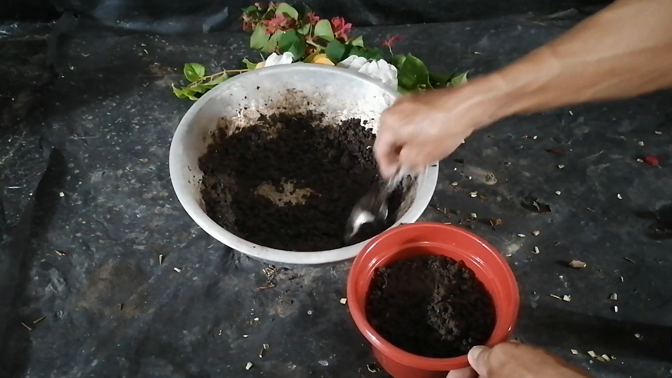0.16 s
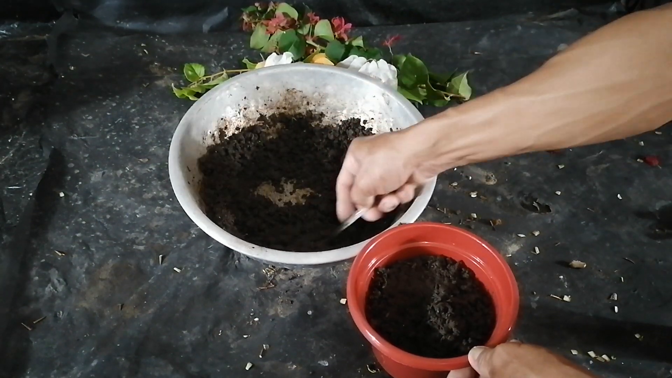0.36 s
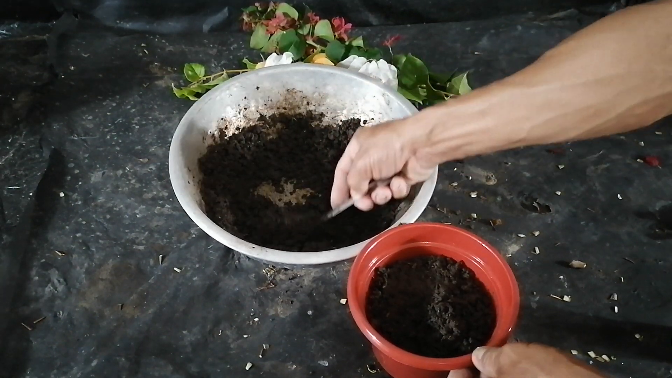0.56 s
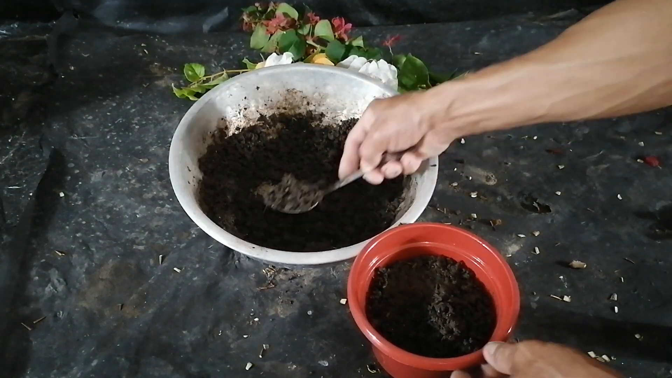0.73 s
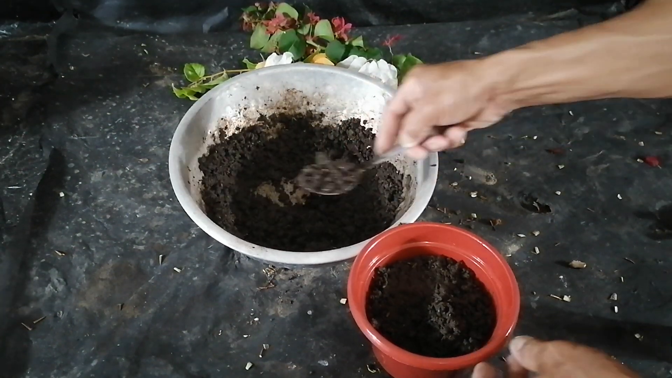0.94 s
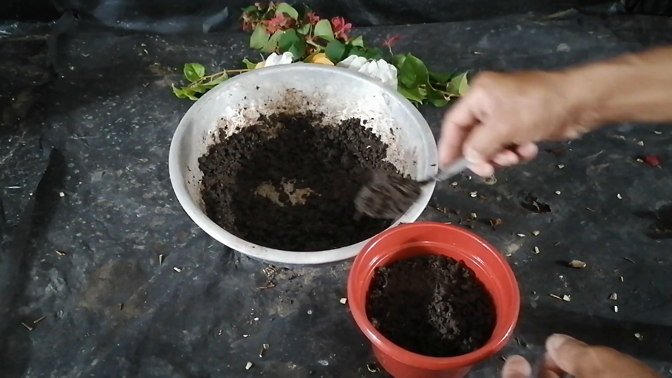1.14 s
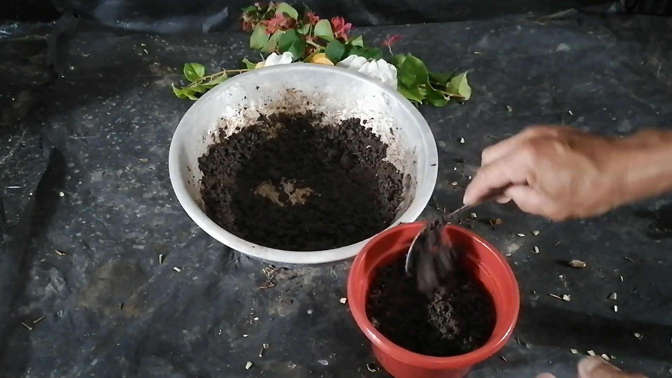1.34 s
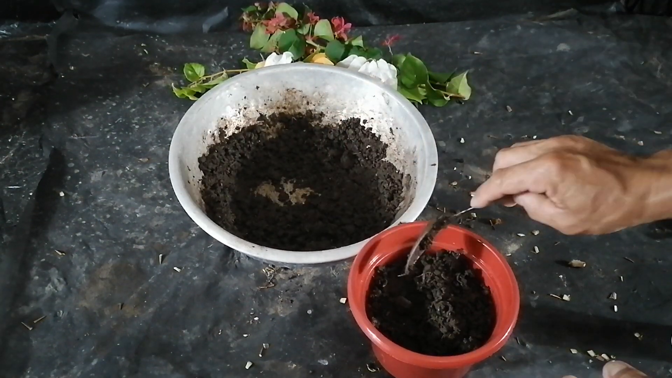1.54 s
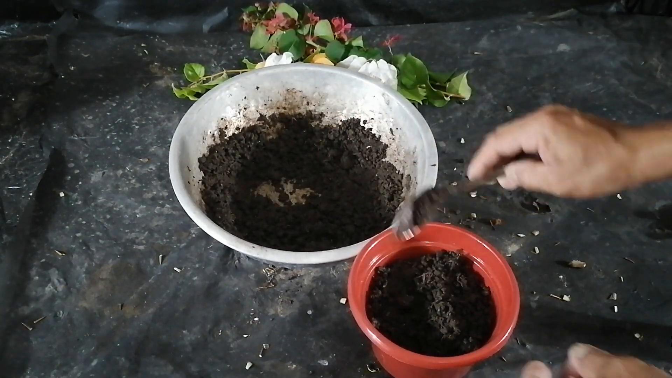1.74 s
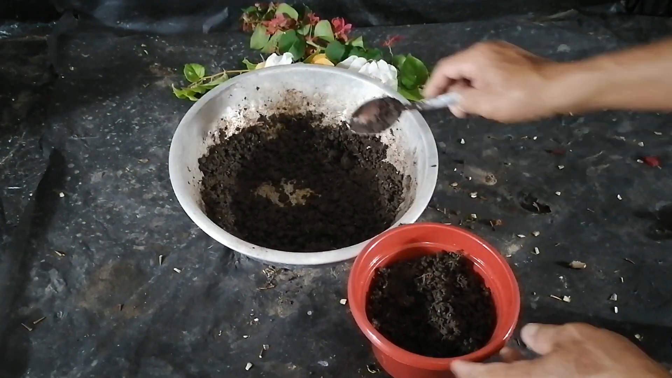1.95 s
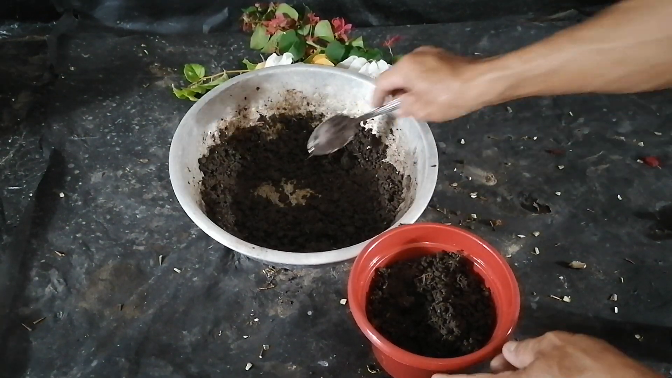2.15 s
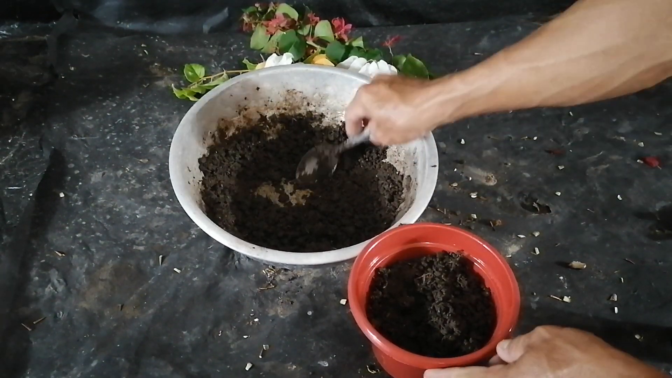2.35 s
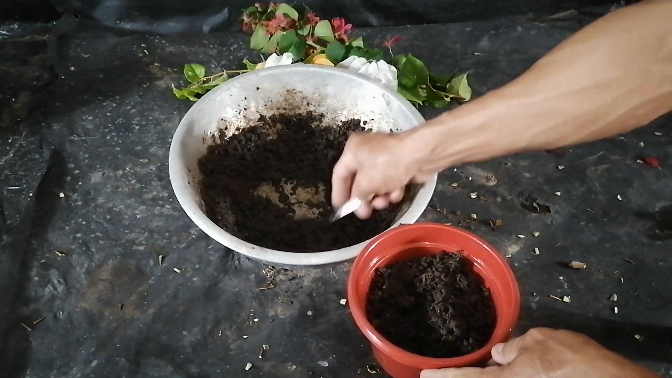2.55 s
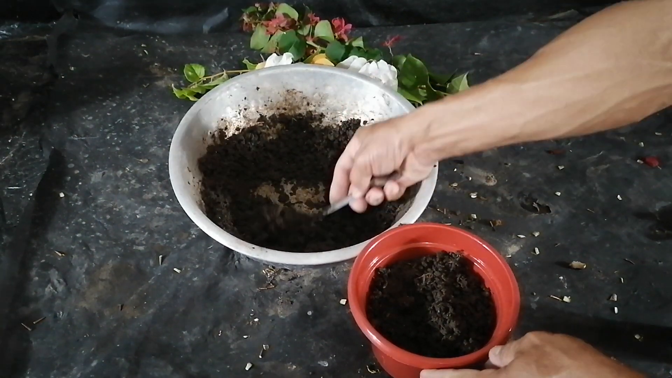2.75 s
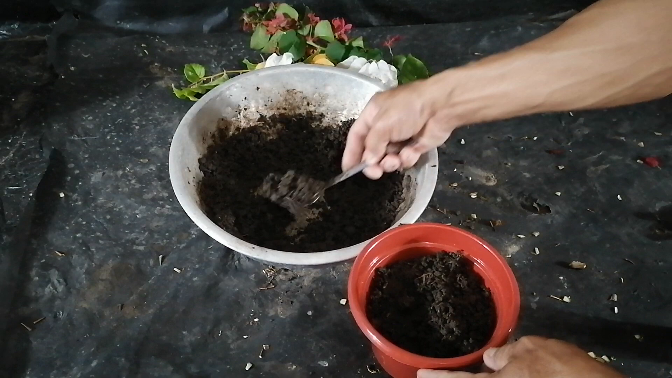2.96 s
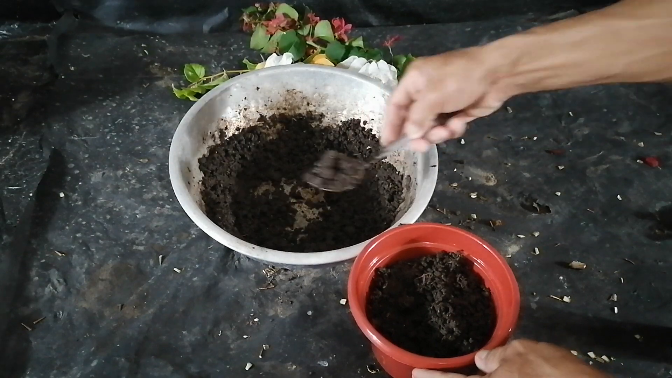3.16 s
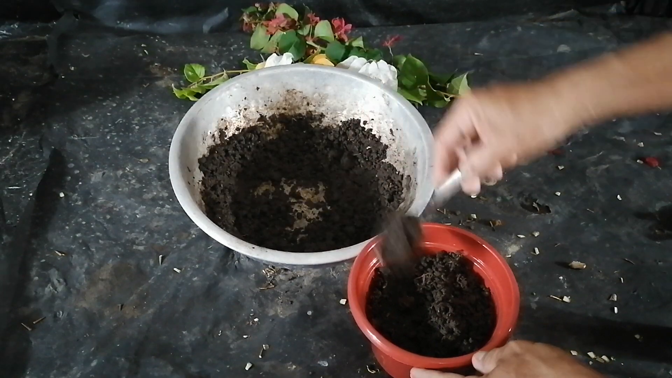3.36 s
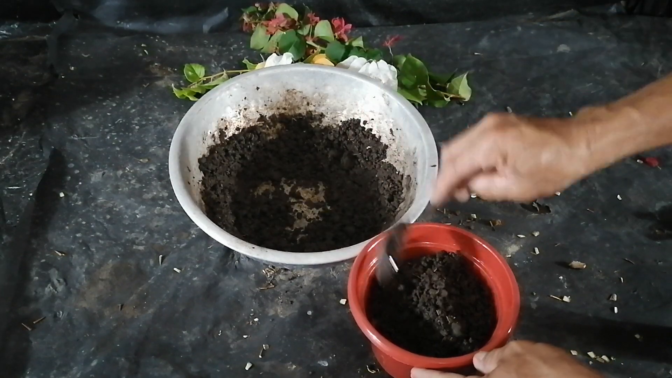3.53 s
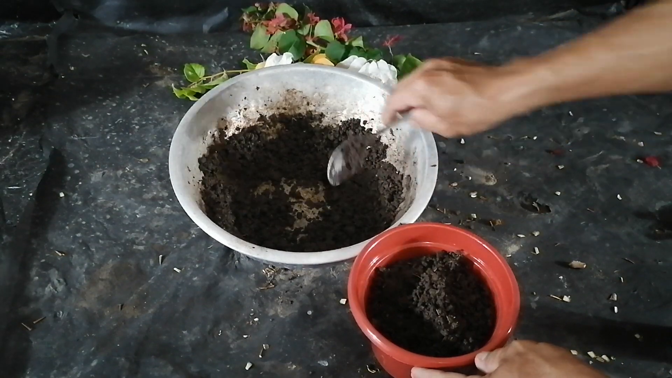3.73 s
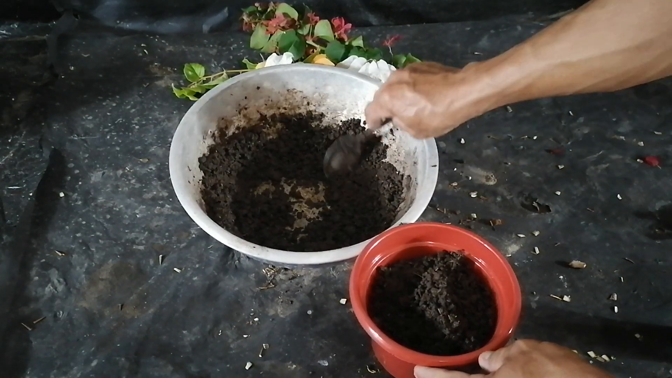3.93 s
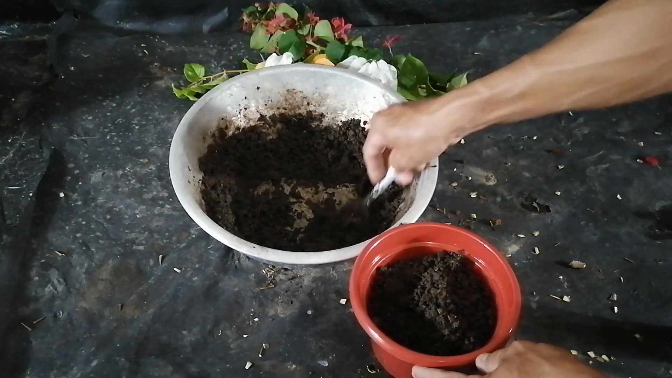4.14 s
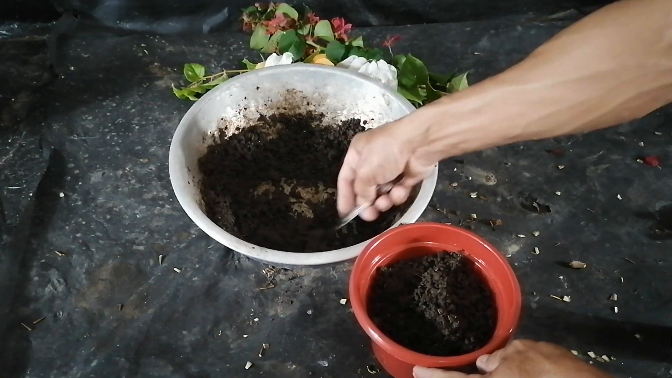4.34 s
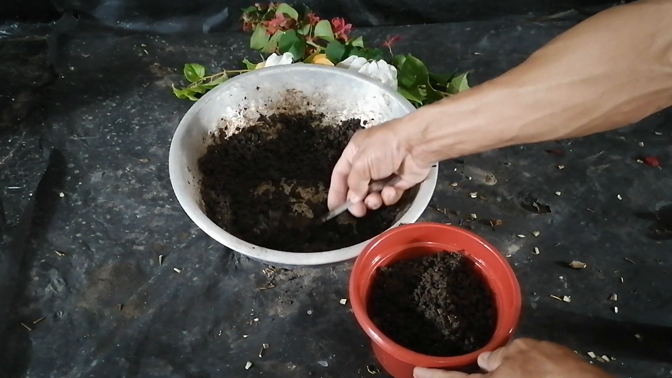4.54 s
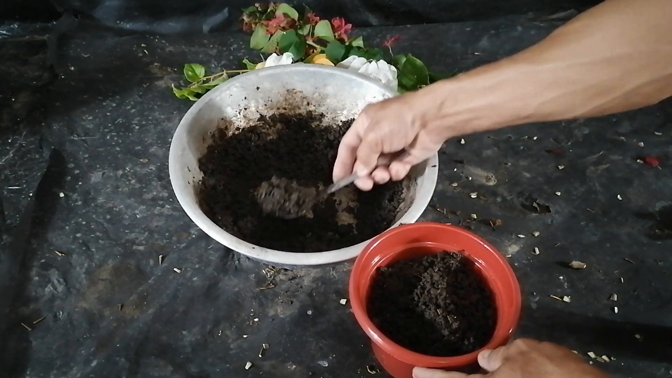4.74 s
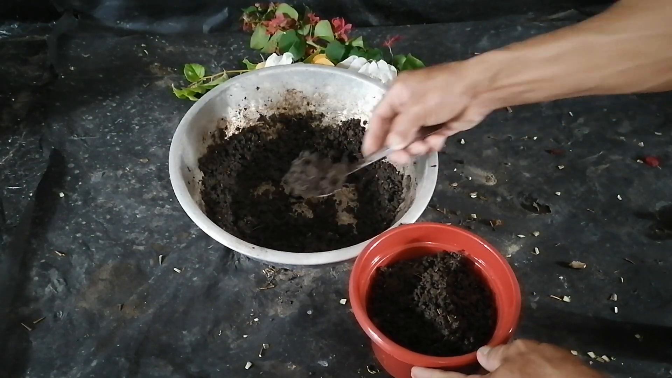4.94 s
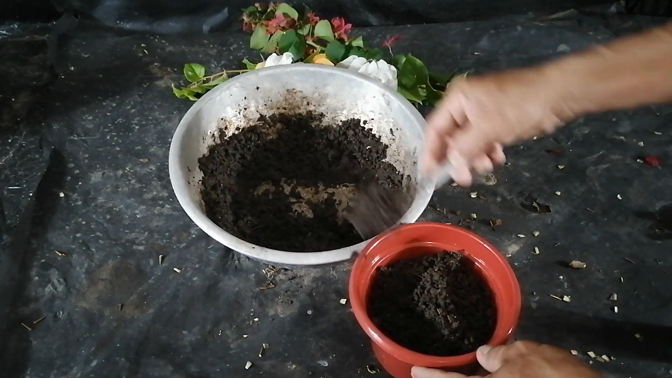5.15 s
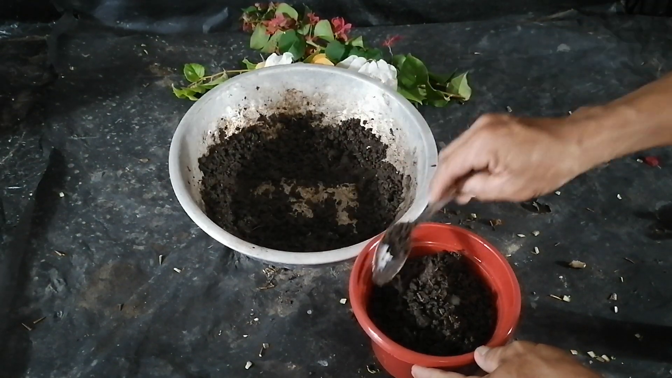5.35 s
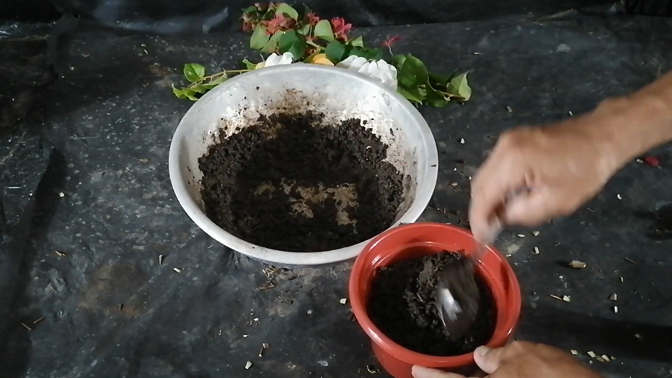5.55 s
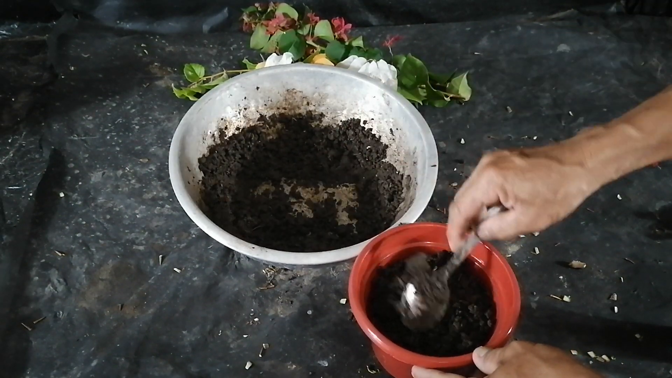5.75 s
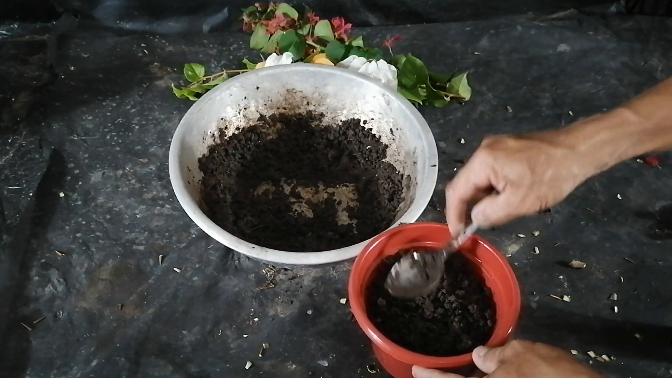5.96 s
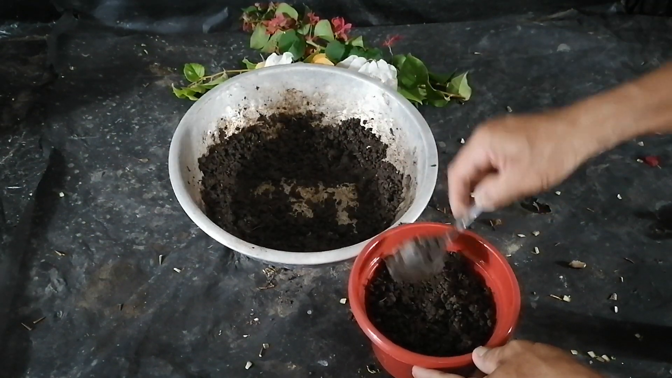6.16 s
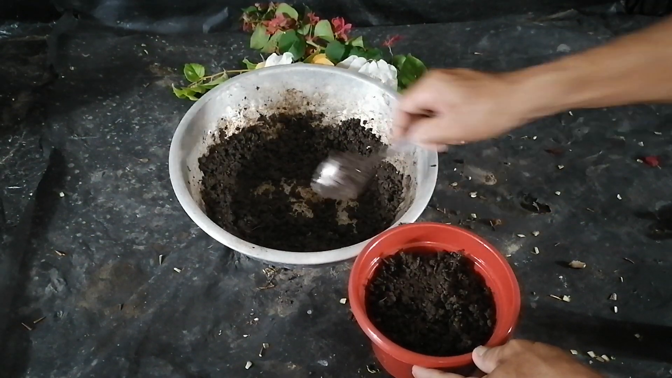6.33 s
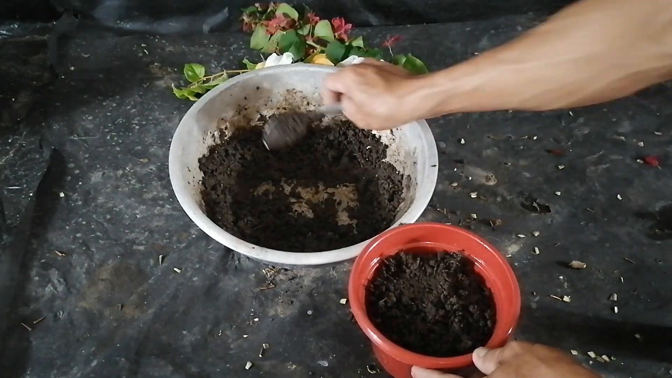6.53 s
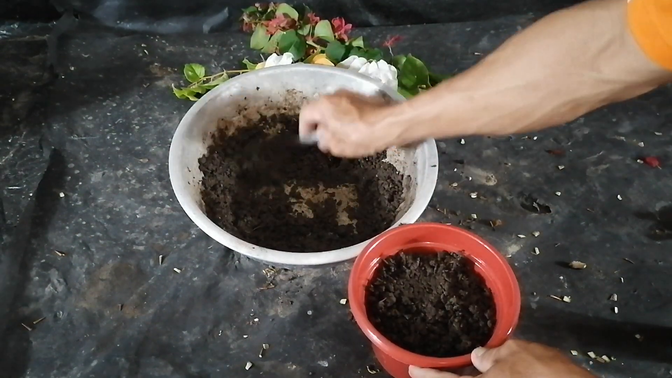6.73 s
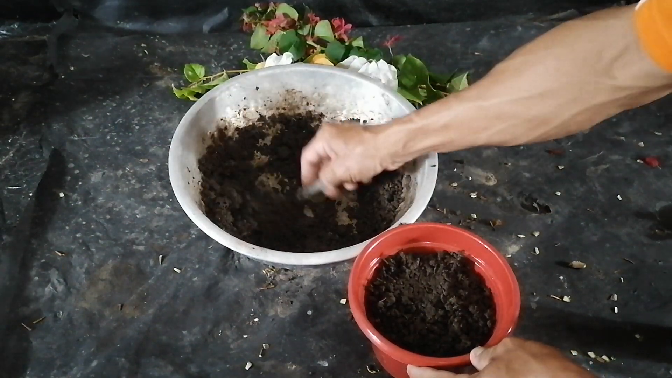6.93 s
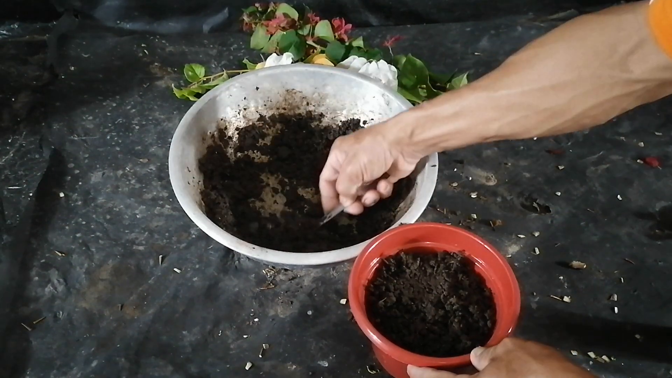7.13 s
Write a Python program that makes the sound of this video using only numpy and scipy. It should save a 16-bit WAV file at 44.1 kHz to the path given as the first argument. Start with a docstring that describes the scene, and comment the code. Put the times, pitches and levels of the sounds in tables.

```python
"""A small quiet room, the microphone close to a basin of moist potting mix and a plastic pot.
A metal spoon digs four times: the tip sinks in with a swelling crunch, the edge scrapes the basin,
then the bowl ploughs through the mix and the basin's wall booms. Between scoops, soil thuds softly
into the pot and the spoon knocks on it. Room air and a faint, high electrical hum lie behind it all."""
import sys
import numpy as np
from scipy import signal
from scipy.fft import rfft, irfft
from scipy.io import wavfile

SR = 44100
rng = np.random.default_rng(int(sys.argv[2]) if len(sys.argv) > 2 else 0)


def master_out(mix):
    """Clip the mix to full scale and print it as 16-bit PCM to the path in sys.argv[1]."""
    frames = np.transpose(np.atleast_2d(mix))
    ceiling = np.clip(frames, -1, 1)
    pcm = np.round(ceiling * 32767).astype(np.int16)
    wavfile.write(sys.argv[1], SR, pcm)


N = 321489
TIME = np.arange(N) / SR

# Resonances of the basin, the buried spoon and falling crumbs.
# Each row: frequency in Hz, width in Hz, relative level in dB.
WALL_MODES = [(221, 210, -20), (343, 202, -10.5), (441, 42, -3), (540, 33, -1.5), (556.6, 25.3, 0.5),
              (628, 63.6, 2), (791, 26, 2), (881, 91, -9), (965, 50, -3.5), (1052, 52, -9),
              (1239, 24, -13.5), (2870, 230, -16), (3420, 200, -27.5)]
BOTTOM_MODES = [(230, 49, -20.5), (327.4, 27, -2.5), (444, 23, 3), (510, 14, 2.5), (568, 20, 3.5),
                (1020, 28, 4), (1162, 43, 3), (1210, 22, -0.5)]
EDGE_ON_BASIN_MODES = [(1004, 100, 4), (1447, 210, -2), (1687, 61, 2), (1910, 140, 1), (2263, 240, -1),
                       (2551, 41, 4.5), (2703, 48, -4), (2963, 143, 2), (3280, 150, 1.5), (3680, 410, -7.5)]
BURIED_SPOON_MODES = [(2710, 170, -11.5), (4270, 364, -7), (4870, 600, -3), (5500, 590, -3),
                      (6015, 250, -1), (6464, 310, 2), (6690, 436, 3), (7033, 580, 1)]
CRUMB_MODES = [(696, 340, 2.1), (1690, 580, -1), (3120, 610, 0.39), (5640, 1000, 0.037)]


def scooping():
    """The spoon sticks and slips through the mix; each slip breaks crumbs and shakes the basin."""
    # Resonances of the lightly brushed basin and the free spoon.
    # Each row: frequency in Hz, width in Hz, relative level in dB.
    brushed_modes = [(670, 130, -0.7), (883, 59, 1.6), (1075, 40, -0.3), (1520, 52, -1.6)]
    free_spoon_modes = [(5394, 230, -4.5), (5900, 130, -10)]
    boom, grind, crunch, drum = strokes()
    slips = drift(per_s=260)
    grit = rms_one(grains(per_s=6000, spread_db=1.5) * from_db(2.0 * slips))
    crumbs = rms_one(grains(per_s=9000, spread_db=1.5) * from_db(1.2 * slips))
    lumps = rms_one(grains(per_s=2500, spread_db=2.0) * from_db(1.9 * slips))
    wall = boom * ring(lumps, WALL_MODES)
    bottom = drum * ring(grit, BOTTOM_MODES)
    # a light touch stirs only upper modes of the basin
    lightness = 1 - pressure(grind, half_db=-52)
    brushed = lightness * from_db(1.0) * ring(grit, brushed_modes)
    edge = grind * (ring(grit, EDGE_ON_BASIN_MODES) + brushed)
    # the steel bowl rings until the soil buries it
    free = 1 - pressure(crunch, half_db=-47.5)
    buried = np.sqrt(1 - free ** 2)
    spoon = crunch * (buried * ring(crumbs, BURIED_SPOON_MODES) + free * ring(grit, free_spoon_modes))
    return wall + bottom + edge + spoon


def strokes():
    """Gains of the wall's boom, edge's grind, soil's crunch and bottom's drumming; moves add in power."""
    # The tip sinks in, louder with depth. Each row: start and length in seconds,
    # final crunch and boom in dB.
    entries = [(0.165, 0.215, -38, -58), (3.989, 0.089, -49, -54), (4.232, 0.089, -51, -55.5),
               (6.714, 0.13, -34.5, -52.5)]
    # The edge scrapes the basin and eases off. Each row: start and hold in seconds,
    # grind, boom, crunch and drumming in dB, fade in dB per second.
    scrapes = [(0.157, 0.087, -56, -73, -63, -71, 119), (2.528, 0.0076, -43.5, -59.5, -45.5, -47, 399),
               (2.567, .05, -55.5, -54.5, -52.5, -53, 300.5), (2.626, 0.058, -35, -46, -35.5, -36, 302),
               (4.117, 0.04, -42.5, -48.5, -42, -48.5, 187), (6.903, 0.09, -40, -40, -39, -52, 113)]
    # The bowl ploughs through the mix. Each row: start and hold in seconds,
    # crunch, boom and grind in dB, rise in dB per second.
    pushes = [(0.393, 0.11, -31.5, -38, -47, 555), (2.709, 0.043, -35.5, -41.5, -51, 901),
              (4.367, .11, -32.5, -41.5, -54, 598), (7.134, 0.038, -34.5, -42, -52, 898)]
    boom, grind, crunch, drum = [], [], [], []
    swell_db = 28.5
    for start, length, crunch_db, boom_db in entries:
        depth = envelope(start + length, hold=0, rise=swell_db / length, fall=506)
        boom.append(from_db(boom_db) * depth)
        grind.append(from_db(boom_db - 4.5) * depth)
        crunch.append(from_db(crunch_db) * depth)
    for start, hold, grind_db, boom_db, crunch_db, drum_db, fade in scrapes:
        force = envelope(start, hold, rise=554, fall=fade)
        boom.append(from_db(boom_db) * force)
        grind.append(from_db(grind_db) * force)
        crunch.append(from_db(crunch_db) * force)
        drum.append(from_db(drum_db) * force)
    sag = 39.5   # dB per second: the push slackens as the bowl fills, then falls as the spoon lifts out
    for start, hold, crunch_db, boom_db, grind_db, rise in pushes:
        weight = envelope(start, hold, rise, fall=177.5, sag=sag)
        boom.append(from_db(boom_db) * weight)
        grind.append(from_db(grind_db) * envelope(start, hold, rise, fall=248, sag=sag))
        crunch.append(from_db(crunch_db) * envelope(start, hold, rise, fall=214.5, sag=sag))
        drum.append(from_db(grind_db - 4.5) * weight)
    return [np.linalg.norm(moves, axis=0) for moves in (boom, grind, crunch, drum)]


def basin_strikes():
    """The spoon's edge hits the basin: a few milliseconds of chatter between steel, grit and basin."""
    # Each row: start in seconds, the basin's peak in dB, chatter length in seconds,
    # crunch in dB relative to the basin, bottom in dB relative to the edge.
    strikes = [(0.308, -48, 0.01, 18, -20), (0.377, -33, 0.0031, 1, 10), (2.489, -41, 0.0062, -3, -16),
               (2.512, -26, 0.012, -1, -8), (2.615, -19.5, 0.015, -6.5, 5.5), (2.644, -25, 0.017, -1, -1),
               (4.122, -21.5, 0.0079, -2.5, -18), (4.139, -20, 0.0055, 0, -6.5),
               (4.347, -40, 0.0076, 3, 12), (4.373, -31, 0.0079, -1, 7), (6.834, -33, 0.0087, 11.5, -3.5),
               (6.88, -24.5, 0.014, 0, -34), (6.992, -34.5, 0.005, 7, -2), (7.125, -35, 0.012, 6, -13)]
    out, t = np.zeros(N), TIME[:SR // 8]
    for start, db, length, crunch_db, bottom_db in strikes:
        chatter = rng.standard_normal(len(t)) * np.exp(-(t / length) ** 4)
        edge = ring(chatter, EDGE_ON_BASIN_MODES)
        wall = from_db(-13.5) * ring(chatter, WALL_MODES)
        bottom = from_db(bottom_db) * ring(chatter, BOTTOM_MODES)
        crunch = from_db(crunch_db) * peak_one(ring(chatter, BURIED_SPOON_MODES))
        add(out, start, from_db(db) * (peak_one(edge + wall + bottom) + crunch))
    return out


def grit_snaps():
    """Grains of grit snap under the spoon, each with a short, bright ping."""
    # Each row: start in seconds, peak in dB, pitch in Hz.
    snaps = [(0.3125, -30.5, 5500), (0.4683, -21.5, 6700), (0.489, -22.5, 5800), (2.7052, -21, 6580),
             (2.732, -34, 6680), (2.7656, -27, 7200), (2.7735, -27, 6940), (2.9442, -38.5, 5250),
             (6.7457, -45, 5440), (6.8339, -25.5, 5350), (6.9827, -24, 7100), (7.1457, -20.5, 7150)]
    return pings(snaps, cycles=4.1)


def pot_knocks():
    """The spoon ticks on the thin pot: the struck spot gives a hollow note and the whole wall answers."""
    # Each row: start in seconds, the note's peak in dB, its pitch in Hz,
    # wall and tick in dB relative to the note.
    knocks = [(1.4788, -59.5, 1400, -2, 12), (1.538, -61, 1300, 7, -12), (3.087, -55, 970, 5, -18),
              (3.189, -42, 1070, -1, -14), (3.196, -48.5, 700, 4.5, -10), (3.633, -52.5, 1200, -1, 8.5),
              (5.262, -42.5, 1430, -30, -25), (5.291, -57, 583, 1, -9), (5.4610, -28, 1910, -26, -29),
              (5.4632, -37, 697, 6, -33), (5.866, -63.5, 900, 2, 5), (5.994, -57, 3600, -12, 3)]
    # The plastic wall's resonances. Each row: frequency in Hz, width in Hz, relative level in dB.
    pot_modes = [(332, 430, -7), (604, 214, 9.5), (667, 340, -11), (990, 77, 1), (1520, 100, 3.5),
                 (1716, 220, -1), (2270, 580, -4), (3140, 120, -4)]
    out = np.zeros(N)
    wall, tick = peak_one(response(pot_modes)), peak_one(response(CRUMB_MODES))
    for start, db, hz, wall_db, tick_db in knocks:
        knock = ping(hz, cycles=1.1) + from_db(wall_db) * wall + from_db(tick_db) * tick
        add(out, start, from_db(db) * knock)
    return out


def falling_clods():
    """Clods land in the pot, each with one dull thud."""
    # Each row: start in seconds, peak in dB, pitch in Hz.
    clods = [(1.602, -46, 414), (1.674, -51, 72), (1.693, -53, 71), (1.726, -45.5, 128)]
    return pings(clods, cycles=0.37)


def spilling():
    """Loose crumbs slide off the spoon and patter down; the heavier ones thud on the soil in the pot."""
    # Each row: start and hold in seconds, thud and trickle in dB.
    spills = [(0.74, 0.13, -71.5, -75), (0.885, .09, -70.5, -69), (1.488, 0.15, -68.5, -67),
              (1.675, 0.072, -55.5, -63), (2.067, 0.26, -74, -71.5), (3.097, 0.029, -71, -71),
              (3.2, 0.04, -85, -70.5), (5.283, 0.078, -75, -70.5), (5.982, 0.027, -78, -73)]
    # Resonances of the pot with soil in it. Each row: frequency in Hz, width in Hz, relative level in dB.
    filled_pot_modes = [(77, 37, 3), (129, 40, 0.5), (210, 51, 0), (303, 42, 1.5), (364, 73, -1.5)]
    thud, trickle = 0, 0
    for start, hold, thud_db, trickle_db in spills:
        flow = envelope(start, hold, rise=598, fall=189)
        thud += from_db(thud_db) * flow
        trickle += from_db(trickle_db) * flow
    lumps = thud * ring(grains(per_s=500, spread_db=0.5), filled_pot_modes)
    patter = trickle * ring(grains(per_s=1500, spread_db=2.8), CRUMB_MODES)
    return lumps + patter


def room(x):
    """Diffuse echoes reach the microphone after a few milliseconds and last longest in the midrange."""
    # Each row: frequency in Hz, time to fall by 60 dB in seconds.
    decay_times = [(100, 0.17), (700, 0.32), (2500, 0.1), (7000, 0.16)]
    hz, t60 = np.transpose(decay_times)
    t, tail = TIME[:SR // 2], 0
    edges_hz = np.geomspace(60, 9000, 9)
    for low, high in zip(edges_hz, edges_hz[1:]):
        bandpass = signal.butter(2, [low, high], "band", fs=SR, output="sos")
        band = signal.sosfilt(bandpass, rng.standard_normal(len(t)))
        tail += band * from_db(-60 * t / np.interp(np.sqrt(low * high), hz, t60))
    first_echo_s = 0.0076
    tail *= np.clip(t / first_echo_s - 1, 0, 1)
    share = 2 * edges_hz[-1] / SR   # echoes keep the power of the sound within their band
    return signal.fftconvolve(x, tail * np.sqrt(share / np.sum(tail ** 2)))[:N]


def room_tone():
    """Room air, mains hum and a faint, high whine of electrical noise."""
    # The air's rumble and hiss. Each row: frequency in Hz, relative spectral level in dB.
    air_spectrum = [(20, 0.5), (70, -4), (140, -6.5), (300, -9), (600, -14.5), (1000, -20.5), (1700, -24),
                    (3200, -23), (3800, -28.5), (4600, -22.5), (5100, -19.5), (5900, -17.5), (7400, -10.5),
                    (8000, -19.5)]
    # Each row: centre in Hz, width in Hz, rms level in dB.
    whine_bands = [(2346, 275, -72.5), (2627, 460, -72.5), (2933, 18, -84), (4822, 67, -80),
                   (6170, 120, -79.5), (6573, 89, -72), (6825, 660, -65.5)]
    # Each row: frequency in Hz, rms level in dB.
    mains_tones = [(60, -72.5), (120, -80.5)]
    hz = np.maximum(np.arange(N // 2 + 1) * SR / N, 1)
    air_hz, air_db = np.transpose(air_spectrum)
    air_shape = from_db(np.interp(np.log(hz), np.log(air_hz), air_db))
    air = from_db(-64) * shaped_noise(air_shape)
    whine = sum(from_db(db) * shaped_noise(1 / np.sqrt(1 + (2 * (hz - centre) / width) ** 4))
                for centre, width, db in whine_bands)
    mains = sum(from_db(db) * np.sqrt(2) * np.sin(2 * np.pi * (tone_hz * TIME + rng.random()))
                for tone_hz, db in mains_tones)
    return air + whine + mains


def response(modes):
    """What a body rings with after one click: damped waves of alternating sign, unit energy."""
    t = TIME[:SR // 12]
    wave = sum((-1) ** k * from_db(db) * width * np.exp(-np.pi * width * t) * np.cos(2 * np.pi * hz * t)
               for k, (hz, width, db) in enumerate(modes))
    low_cut_hz = 0.76 * modes[0][0]
    wave = signal.sosfilt(signal.butter(2, low_cut_hz, "high", fs=SR, output="sos"), wave)
    return wave / np.sqrt(np.sum(wave ** 2))


def ring(clicks, modes):
    """Clicks played through a body."""
    return signal.fftconvolve(clicks, response(modes))[:len(clicks)]


def ping(hz, cycles):
    """A heavily damped tone that swells for the given number of cycles, then dies; peak 1."""
    t = TIME[:SR // 12]
    age = t * hz / cycles
    return peak_one(age * np.exp(-age) * np.sin(2 * np.pi * hz * t))


def pings(rows, cycles):
    """Single contacts, each at a pitch of its own."""
    out = np.zeros(N)
    for start, db, hz in rows:
        add(out, start, from_db(db) * ping(hz, cycles))
    return out


def grains(per_s, spread_db):
    """Random contacts, many small and a few large; rms 1."""
    sizes = from_db(spread_db * np.minimum(rng.exponential(1, N), 4))
    signs = rng.choice([-1, 1], N)
    return rms_one(sizes * signs * (rng.random(N) < per_s / SR))


def envelope(start, hold, rise, fall, sag=0):
    """Gain that reaches 1 at the start, sags while held, then dies away; slopes in dB per second."""
    age = TIME - start
    loss_db = rise * np.maximum(-age, 0) + sag * np.clip(age, 0, hold) + fall * np.maximum(age - hold, 0)
    return from_db(-np.minimum(loss_db, 120))


def pressure(gain, half_db):
    """How firmly the spoon presses, 0 to 1, from the strength of the stroke."""
    return np.clip(gain / (gain + from_db(half_db)), 0, 1)


def drift(per_s):
    """A line wandering between random values; rms 1."""
    knots = rng.standard_normal(N // 8)
    return rms_one(np.interp(TIME * per_s, np.arange(len(knots)), knots))


def shaped_noise(spectrum):
    """Noise with the given amplitude spectrum; rms 1."""
    return rms_one(irfft(rfft(rng.standard_normal(N)) * spectrum, N))


def add(out, start, sound):
    """Mix a short sound in at a start time in seconds."""
    at = max(round(start * SR), 0)
    out[at:at + len(sound)] += sound[:N - at]


def from_db(db):
    return 10 ** (np.asarray(db) / 20)


def rms_one(x):
    return x / np.sqrt(np.mean(x ** 2) + 1e-20)


def peak_one(x):
    return x / np.max(np.abs(x))


def scene():
    """Basin and pot stand close to one microphone; the knocks carry more of the room behind them."""
    digging = scooping() + basin_strikes() + grit_snaps()
    filling = spilling() + falling_clods()
    near = digging + filling
    knocks = pot_knocks()
    echoes = from_db(-6) * room(knocks) + from_db(-13) * room(near)
    return (near + knocks + echoes + room_tone())[None]


def record(dry):
    """A steep low-pass cuts the top, 70 dB down from 8100 Hz."""
    return signal.sosfilt(signal.cheby2(18, 70, 8100, fs=SR, output="sos"), dry)


dry = scene()
out = record(dry)
master_out(out)
```